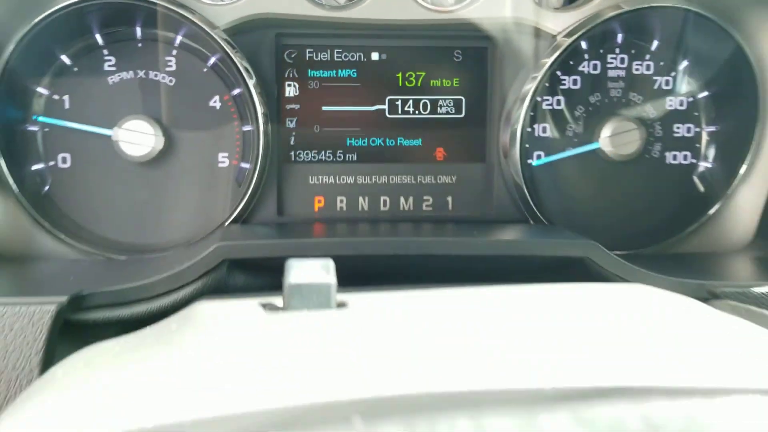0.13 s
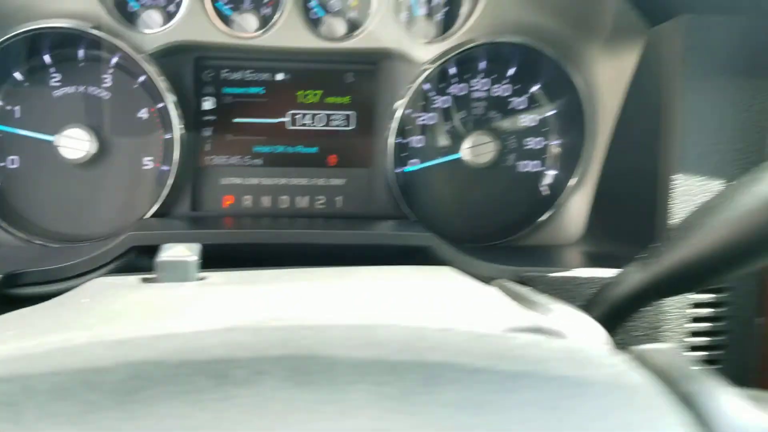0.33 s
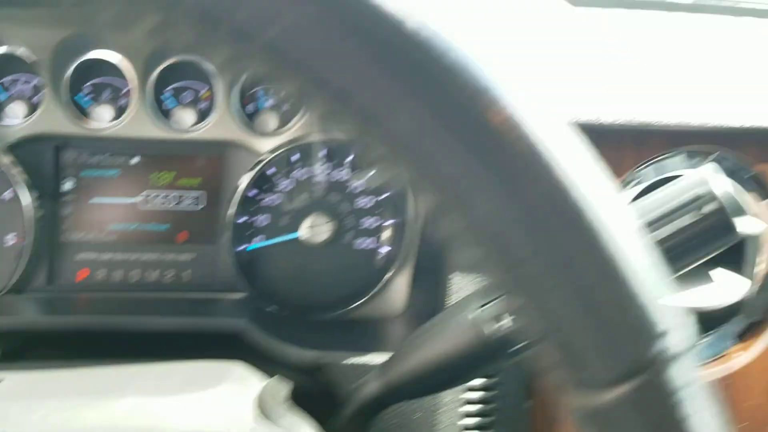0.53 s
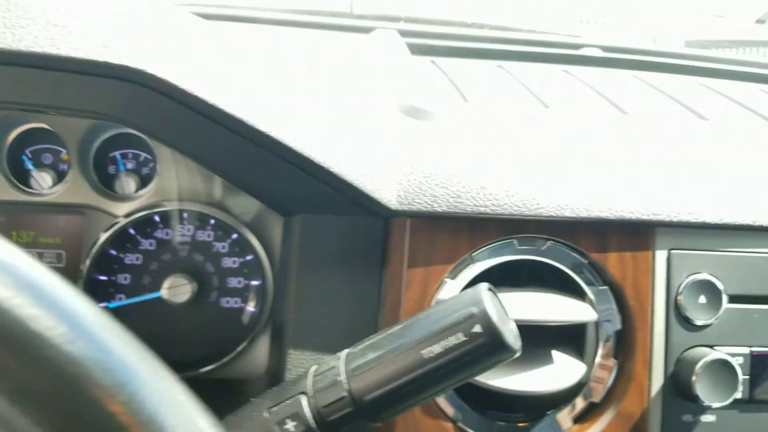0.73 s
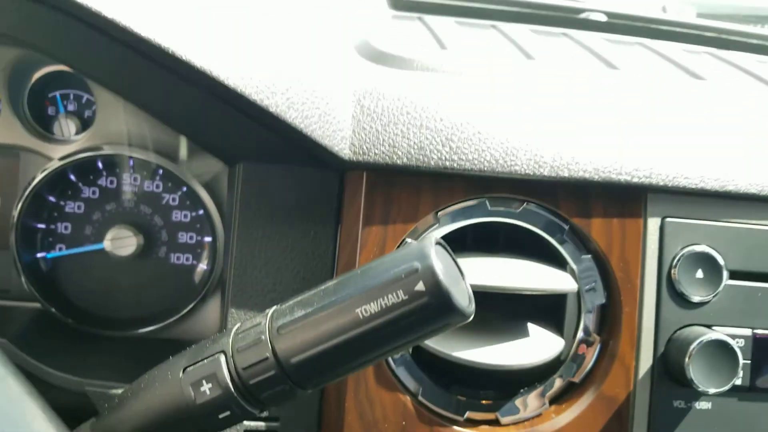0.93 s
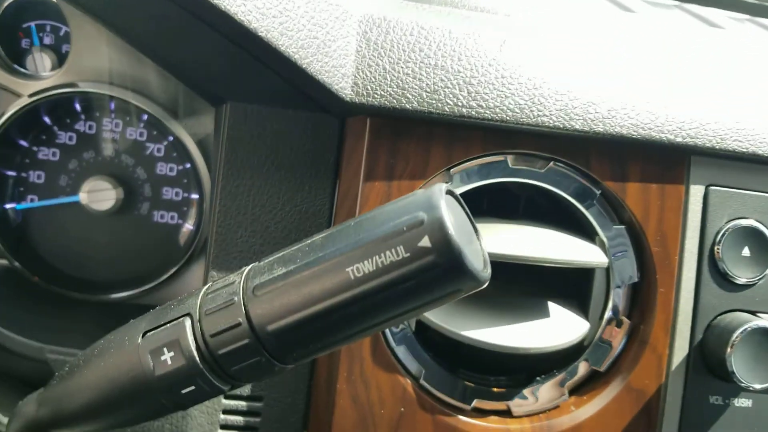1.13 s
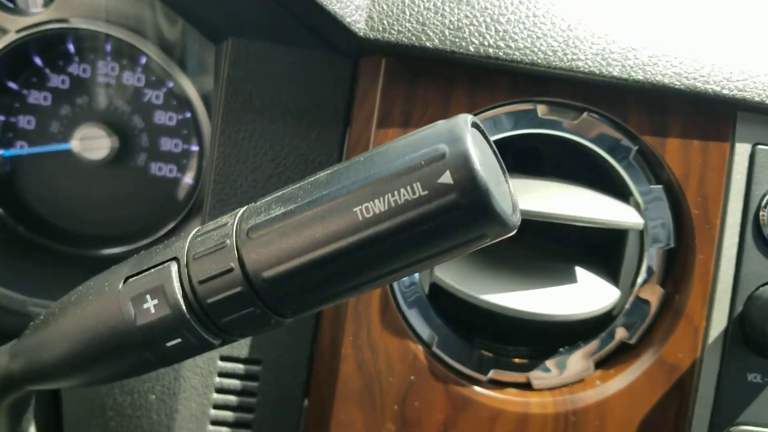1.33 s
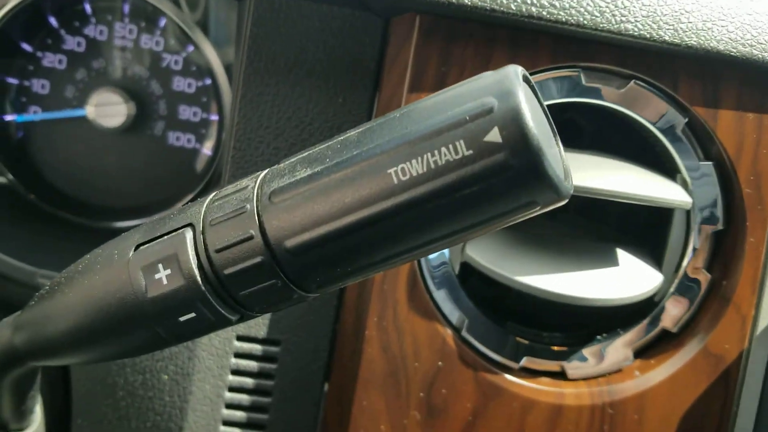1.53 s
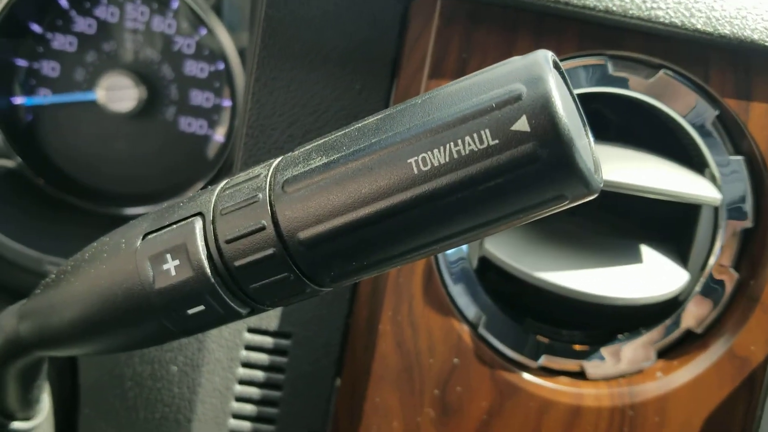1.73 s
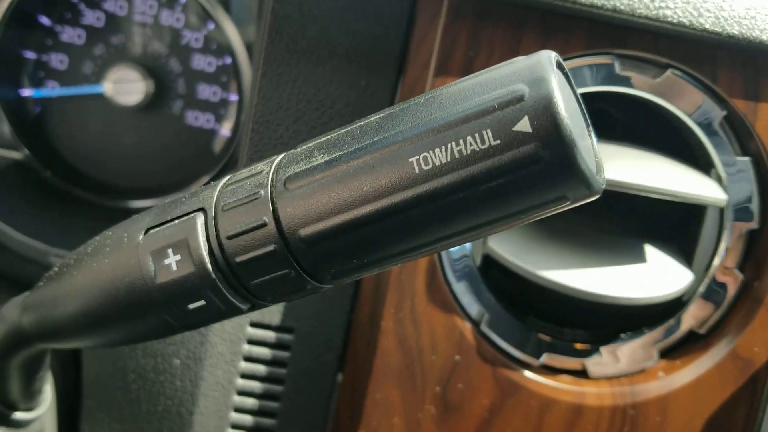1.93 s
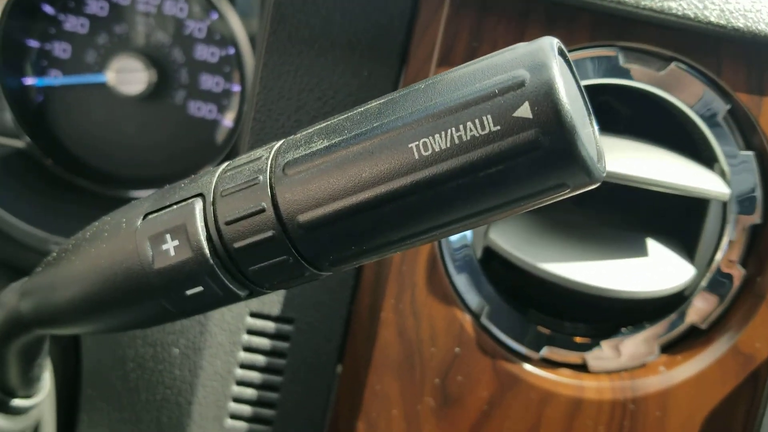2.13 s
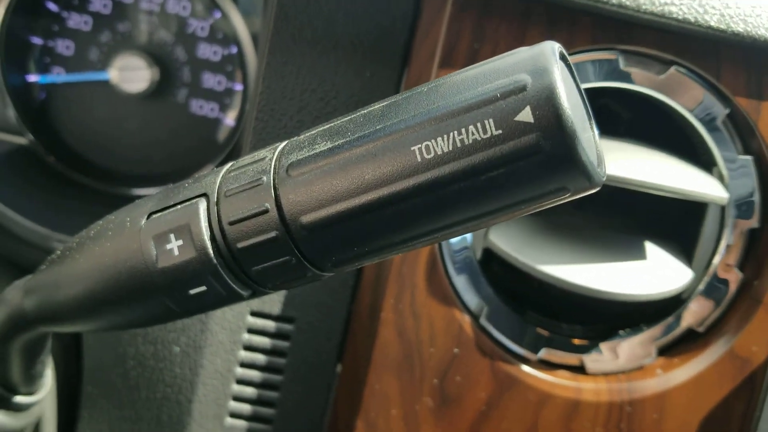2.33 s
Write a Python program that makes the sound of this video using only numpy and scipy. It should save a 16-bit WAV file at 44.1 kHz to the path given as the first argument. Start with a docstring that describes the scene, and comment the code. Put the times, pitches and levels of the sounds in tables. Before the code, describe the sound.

The steady, deep rumble of an idling diesel fills a truck cab, over soft vent air. The handheld microphone picks up a faint grip rustle and sleeve swish, then a slightly brighter hiss as it passes a vent.

```python
"""A V8 diesel idles, heard in a truck's cab. From the start, eight uneven firings a cycle make the cab
boom, over muffled clatter, engine tones, hissing air vents and a faint, high tick on the left.
Early on, the hand holding the microphone rustles, then a sleeve swishes as it moves towards the dash.
At about 1.5 seconds it passes a vent's hollow, bright hiss. Near the end the air sounds duller."""
import sys
import numpy as np
from scipy import signal
from scipy.fft import rfft, irfft, next_fast_len
from scipy.io import wavfile
from scipy.ndimage import map_coordinates

SR = 44100
rng = np.random.default_rng(int(sys.argv[2]) if len(sys.argv) > 2 else 0)


def unload_wav(signal):
    """Save mono or channel-first audio to the path in sys.argv[1] as 16-bit WAV at rate SR, clipped to [-1, 1]."""
    wavfile.write(
        sys.argv[1],
        SR,
        np.round(np.clip(np.atleast_2d(signal).T, -1, 1) * 32767).astype(np.int16),
    )


N = 108971
FIRING_HZ = 40.677  # firings a second, all cylinders together
BOOM_PAN_DB = 2.5  # how much louder the hum, rumble and upper boom are on the left

# How alike the two ears hear noise. Each row: pitch in Hz, likeness from -1 (opposite) to 1 (same).
EAR_LIKENESS = [(40, 0.72), (150, 0.53), (350, 0.56), (700, 0.33), (1300, -0.62), (2500, 0.097),
                (5000, -0.043), (15000, 0.019)]
# The tone colour of each noise. Each row: pitch in Hz, relative level in dB.
FIZZ_COLOUR = [(5000, -23), (7000, -8), (7950, -1.5), (8800, -8), (12000, -24), (14000, -0.5),
               (15750, -1.5)]
GRIP_COLOUR = [(1000, -12), (5000, 5), (8000, -12), (12500, 0), (14200, 5), (15600, 2)]
SLEEVE_COLOUR = [(1200, 5), (2300, 6), (3600, 12.5), (4750, 5), (5500, -1), (12000, -19)]
AIR_COLOUR = [(650, -30), (1100, 8), (1340, 7), (1490, 7.5), (1680, 3), (1820, 8), (2050, 2), (2600, 2.5),
              (2930, -1), (3280, -1), (4290, 0.5), (4800, 1), (5300, -6), (5730, -8), (6190, -6.5),
              (7080, -13.5), (7910, -11.5), (11400, -16), (14500, -34), (15800, -22)]
JET_COLOUR = [(2500, -25), (3200, -12), (3550, 11), (4000, -1.5), (6500, -8), (8500, -4), (11000, -4.5),
              (13000, -10), (15500, -18)]
CLATTER_COLOUR = [(120, -32), (280, 6.5), (400, 4), (600, 1.5), (780, 1), (980, 3), (1350, -4.5),
                  (2200, -5.5), (4000, -13.5), (8000, -60)]
RUMBLE_COLOUR = [(15, -10), (38, -1), (55, -4.5), (90, -1.5), (125, -1.5), (165, 4.5), (200, -3.5),
                 (245, -10), (330, -17.5), (600, -42)]
# The faint ticks. Each entry: start in seconds.
TICK_STARTS = [.261, .806, 1.353, 1.91, 2.458]
# The tones in one tick. Each row: pitch in Hz, relative level in dB.
TICK_TONES = [(14200, -5), (14900, -1), (15500, -3)]
# Swells of hand rustle and vent hiss. Each row: middle in seconds, half length in seconds, level in dB.
GRIP_SWELLS = [(0.162, 0.02, -51.5), (0.318, 0.04, -57), (0.426, 0.028, -58), (0.56, 0.03, -52.5)]
VENT_SWELLS = [(0.543, .06, -59), (1.507, 0.075, -56), (1.722, 0.076, -58.5), (1.888, 0.12, -65)]
# How the air, clatter and engine tones rise and fall. Each row: time in seconds, level change in dB.
AIR_CHANGES = [(0, 0.5), (.35, 1), (.58, 1), (.9, -1), (1.25, -0.6), (2.1, -1.5), (2.47, -1.5)]
CLATTER_CHANGES = [(0, 5), (.3, 4), (.7, 2.5), (1.05, -0.5), (1.6, 3), (2.1, 0.8), (2.47, 1)]
TONE_CHANGES = [(0, 2.5), (.35, 4), (.65, -4.5), (1.3, -0.5), (1.65, -1.5), (2.47, -1)]
# The hum of a belt-driven part. Each row: pitch in Hz, level in dB.
BELT_TONES = [(109.5, -39.5), (219, -60)]
# Engine tones. Each row: vibrations per cycle of eight firings, base level in dB.
ENGINE_TONES = [(11, -47), (48, -61.5), (56, -59), (80, -71.5), (104, -68), (112, -67.5), (128, -70),
                (184, -74)]
# Resonances, the pitches at which the vent's grille, the cab's air and its panels like to ring.
# Each row: pitch in Hz, width in Hz, relative level in dB.
GRILLE_RINGS = [(1850, 220, -3), (2166, 180, -1.5), (2650, 490, -13.5), (3570, 140, -8)]
CAB_RINGS = [(40.35, 1.4, -30.1), (91.7, 7.9, -5.8), (92.5, 7.2, -5.2)]
PANEL_RINGS = [(164.7, 40.2, -17.9), (162.7, 31.3, -16.3), (156.2, 13.1, -29.1)]
# The cylinders in firing order; their unevenness makes the throb.
# Each row: boom strength in dB, panel thump strength in dB, lateness in seconds.
CYLINDER_FIRINGS = [(-10.6, 7.9, -.0001), (7.1, -2.1, -.0006), (1.1, -18.4, .0001), (-10.9, 3.4, -.0005),
                    (7.5, 5.8, -.0007), (-3.4, .8, .0018), (6.5, -15.1, -.0016), (8.7, -14.2, .0002)]
# The microphone moves through loud and quiet spots of the boom (standing waves).
# Each row: time in seconds, change of the deepest boom in dB, change an octave higher in dB.
BOOM_CHANGES = [(0, -1.5, 3), (.3, -2, 2.5), (.6, -1, 1), (1.05, 0.7, 0.45), (1.6, 0.5, -0.5),
                (1.88, -0.2, -1.1), (2.12, 1, 0.7), (2.47, 0, 0.4)]


def amp(db):
    """Turn decibels into a number to multiply by."""
    return 10 ** (np.asarray(db) / 20)


def unit(x):
    """Scale a sound to an average (rms) size of 1."""
    return x / np.sqrt(np.mean(x ** 2) + 1e-20)


def along(points, hz):
    """Read between the rows of a table of pitches."""
    pitches, values = np.transpose(points)
    return np.interp(np.log(hz + 1), np.log(pitches + 1), values)


def curves(rows):
    """Give one value per sample for each column after the time."""
    times, *columns = np.transpose(rows)
    return [np.interp(np.arange(N) / SR, times, column) for column in columns]


def wobble(rate):
    """A smooth curve through `rate` random values a second."""
    return map_coordinates(rng.standard_normal(int(N * rate / SR) + 4), [np.arange(N) * rate / SR])


def swell(middle_s, half_s, db):
    """A smooth rise and fall."""
    return amp(db) * np.exp(-((np.arange(N) / SR - middle_s) / half_s) ** 2 / 2)


def pan(db):
    """Make the left side `db` louder than the right."""
    return amp(np.array([[db], [-db]]) / 2)


def filtered(x, response):
    """Multiply each pitch in x by response(hz)."""
    n = x.shape[-1]
    padded = next_fast_len(n + SR)
    return irfft(rfft(x, padded) * response(np.fft.rfftfreq(padded, 1 / SR)), padded)[..., :n]


def noise(colour):
    """Stereo noise, as alike at both ears as the cab makes it."""
    def response(hz):
        angle = np.arccos(np.clip(along(EAR_LIKENESS, hz), -1, 1)) / 2
        return amp(along(colour, hz)) * [np.cos(angle), np.sin(angle)]
    mid, side = filtered(rng.standard_normal((2, N)), response)
    return unit(np.array([mid + side, mid - side]))


def fizz_and_ticks():
    """A thin, high hiss and a faint, regular tick, mostly on the left."""
    age = np.maximum(np.arange(N) / SR - np.array(TICK_STARTS)[:, None], 0)
    fade = np.exp(-age / .0012)
    ticks = sum(amp(db - 51) * fade * np.sin(2 * np.pi * hz * age) for hz, db in TICK_TONES)
    return (ticks.sum(axis=0) + amp(-65.5) * noise(FIZZ_COLOUR)) * pan(12)


def rustles():
    """The hand shifts its grip in short, high hisses; the sleeve swishes as the arm swings."""
    grip = sum(swell(*row) for row in GRIP_SWELLS) * noise(GRIP_COLOUR)
    sleeve = swell(middle_s=.84, half_s=.29, db=-53.5) * noise(SLEEVE_COLOUR)
    return grip * pan(-1) + sleeve


def vent_air():
    """Soft, unsteady air from the dashboard, duller once the microphone is past the vent."""
    low_hz, treble_hz = 1050, 6560
    air = unit(filtered(noise(AIR_COLOUR), lambda f: f ** 4 / (f ** 4 + low_hz ** 4)))
    treble = filtered(air, lambda f: f ** 8 / (f ** 8 + treble_hz ** 8))
    air -= .98 * swell(middle_s=2.4, half_s=.088, db=0) * treble
    return air * amp(-53 + curves(AIR_CHANGES)[0] + .3 * wobble(13.24)) * pan(.5)


def passing_vent():
    """Close to a vent, its grille rings hollowly; straight in front, the jet of air hisses brightly."""
    peaks = lambda f: sum(amp(db) / (1 + (2 * (f - hz) / width) ** 2) for hz, width, db in GRILLE_RINGS)
    hollow = unit(filtered(rng.standard_normal(N), peaks))
    hollow *= sum(swell(*row) for row in VENT_SWELLS)
    jet = swell(middle_s=1.5, half_s=.088, db=-56.5) * noise(JET_COLOUR)
    return hollow * pan(-7.5) + jet * pan(2)


def tone(hz, db):
    """A pure tone that wavers a little in level and pitch."""
    level = np.sqrt(2) * amp(db + 1.5 * wobble(5.24))
    phase = 2 * np.pi * (hz * np.arange(N) / SR + rng.random())
    return level * np.sin(phase + .32 * wobble(6.26))


def belt_hum():
    """A belt-driven part hums, out of step with the firings."""
    return sum(tone(hz, db) for hz, db in BELT_TONES) * pan(BOOM_PAN_DB)


def engine_tones():
    """Tones that keep step with the engine's turning crankshaft."""
    cycle_hz = FIRING_HZ / len(CYLINDER_FIRINGS)
    tones = sum(tone(multiple * cycle_hz, db) for multiple, db in ENGINE_TONES)
    return tones * amp(curves(TONE_CHANGES)[0]) * pan(.5)


def firings(cylinder_db, scatter_db):
    """One click per firing, as strong as its cylinder, with an extra second of run-up in front."""
    count = np.arange(-int(FIRING_HZ) + 2, int(N / SR * FIRING_HZ) + 2)
    cylinder = count % len(CYLINDER_FIRINGS)
    late_s = np.array(CYLINDER_FIRINGS)[cylinder, 2]
    jitter, scatter = rng.standard_normal((len(count), 2)).T
    start_s = .993 + count / FIRING_HZ + late_s + .00006 * jitter
    strength = amp(cylinder_db[cylinder] + scatter_db * scatter)
    return np.bincount((start_s * SR).astype(int), strength, N + SR)[:N + SR]


def clatter(fade_s=.00043):
    """The noise of burning fuel, which jumps up briefly at each firing."""
    clicks = firings(np.zeros(len(CYLINDER_FIRINGS)), scatter_db=7)
    bursts = signal.lfilter([1], [1, -np.exp(-1 / (fade_s * SR))], clicks)[SR:]
    knocks = unit(noise(CLATTER_COLOUR) * (1 + amp(2.5) * bursts))
    return knocks * amp(-53.5 + curves(CLATTER_CHANGES)[0]) * pan(1.5)


def ring(resonances, cylinder_db, muffle_hz=150, stop_hz=204):
    """The firings set resonances ringing, muffled by the wall between engine and cab."""
    def response(f):
        # neighbouring resonances swing opposite ways
        body = sum((-1) ** k * amp(db) * 1j * f * width / (hz * hz - f * f + 1j * f * width)
                   for k, (hz, width, db) in enumerate(resonances))
        wall = 1 / (1 + np.sqrt(2) * 1j * f / muffle_hz - (f / muffle_hz) ** 2)
        return body * wall / (1 + (f / stop_hz) ** 20)
    return filtered(firings(cylinder_db, scatter_db=.24) * SR / FIRING_HZ, response)


def boom(panel_delay_s=.0099):
    """The cab's air and panels boom over a soft rumble; the low notes change as the microphone moves."""
    boom_db, thump_db, _ = np.transpose(CYLINDER_FIRINGS)
    pressure = ring(CAB_RINGS, boom_db)
    pressure += np.roll(ring(PANEL_RINGS, thump_db), round(panel_delay_s * SR))
    below = lambda hz: filtered(pressure, lambda f: 1 / (1 + (f / hz) ** 12))[SR:]
    deep, low = below(hz=60), below(hz=120)
    octave, rest = low - deep, pressure[SR:] - low
    deep_db, octave_db = curves(BOOM_CHANGES)
    upper = amp(octave_db) * octave + rest + amp(-43) * noise(RUMBLE_COLOUR)
    return amp(deep_db) * deep * pan(-1) + upper * pan(BOOM_PAN_DB)


def scene():
    """Add up everything heard in the cab."""
    engine = boom() + belt_hum() + clatter() + engine_tones()
    return engine + vent_air() + passing_vent() + rustles() + fizz_and_ticks()


def record(dry):
    """Cut off the very highest treble."""
    return filtered(dry, lambda hz: hz < 15950)


dry = scene()
out = record(dry)
unload_wav(out)
```